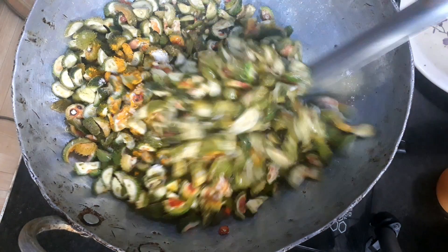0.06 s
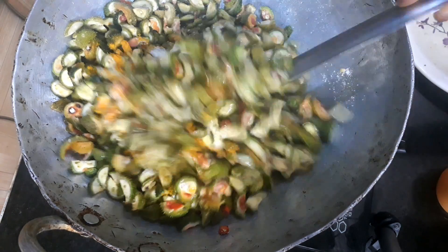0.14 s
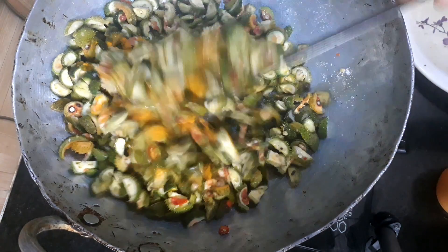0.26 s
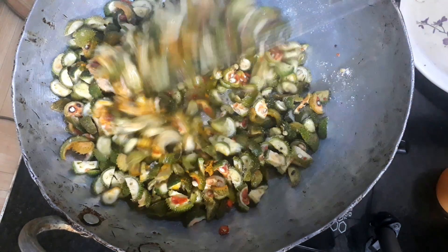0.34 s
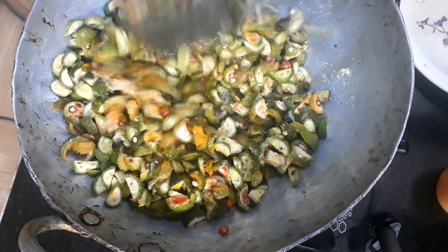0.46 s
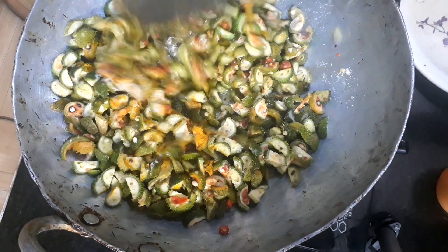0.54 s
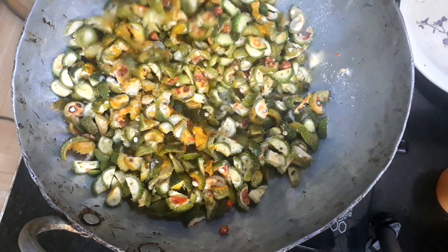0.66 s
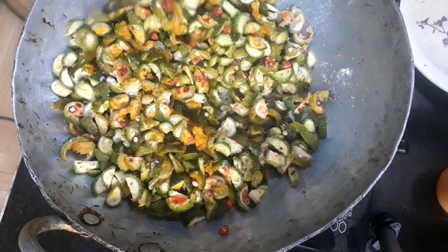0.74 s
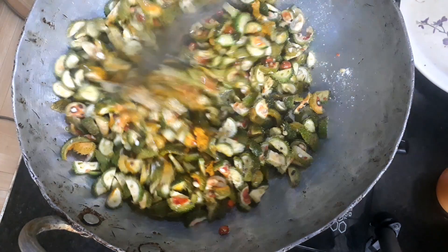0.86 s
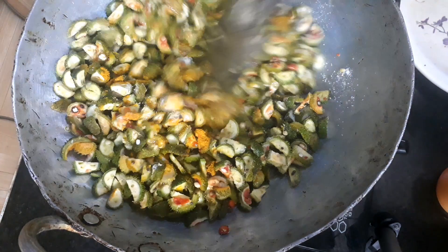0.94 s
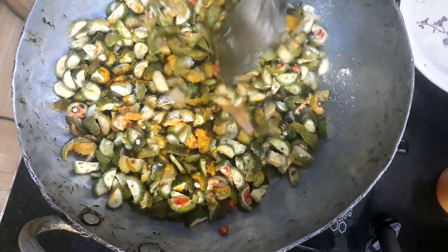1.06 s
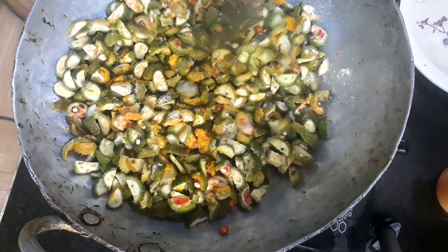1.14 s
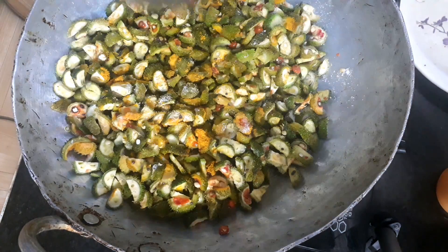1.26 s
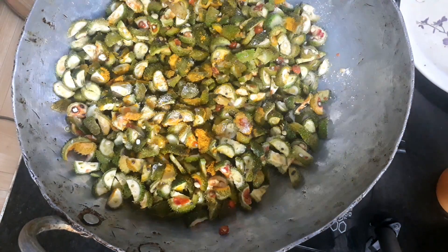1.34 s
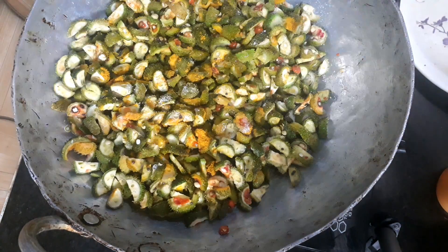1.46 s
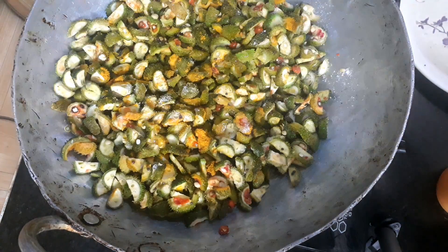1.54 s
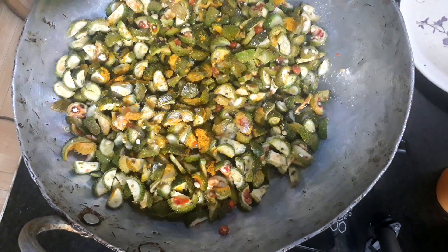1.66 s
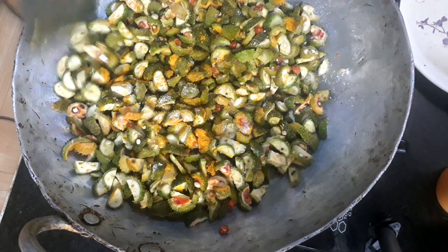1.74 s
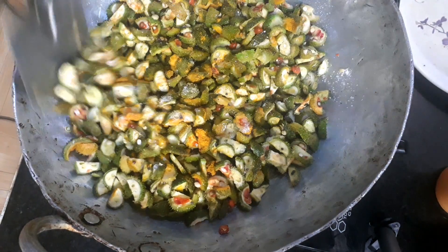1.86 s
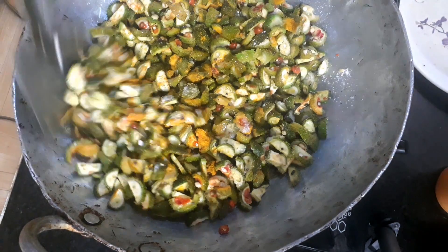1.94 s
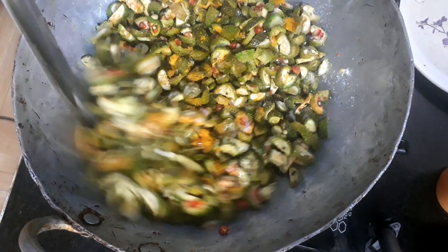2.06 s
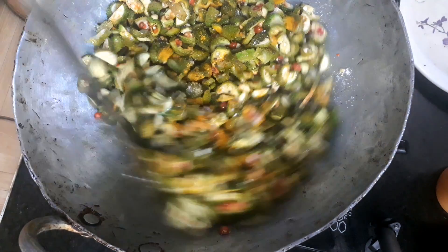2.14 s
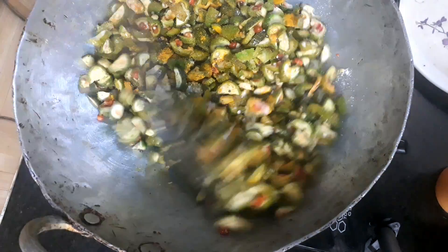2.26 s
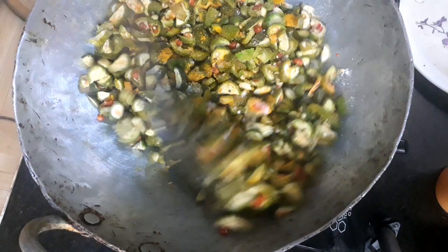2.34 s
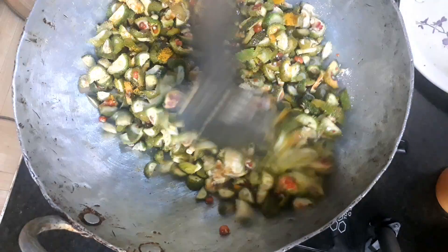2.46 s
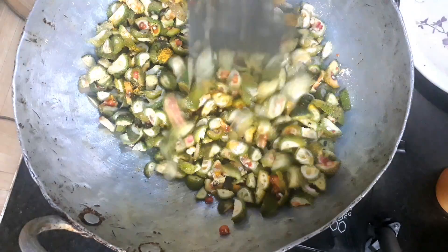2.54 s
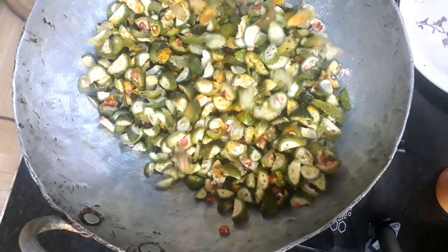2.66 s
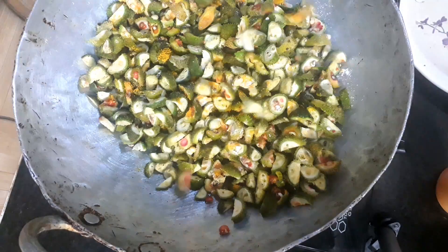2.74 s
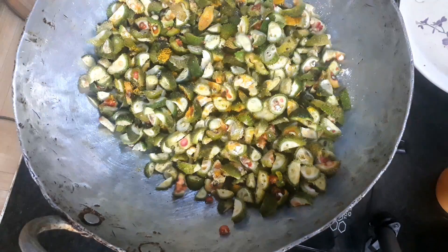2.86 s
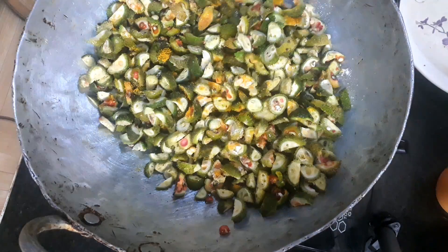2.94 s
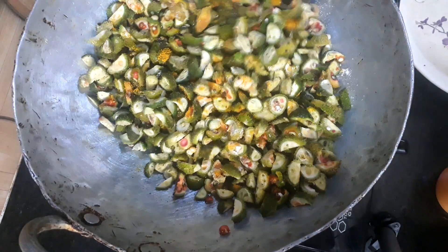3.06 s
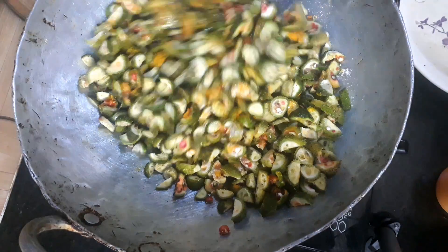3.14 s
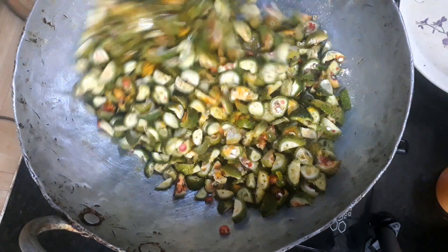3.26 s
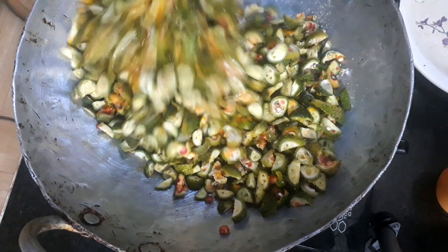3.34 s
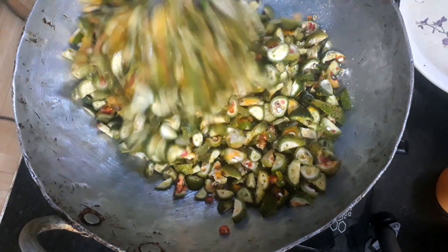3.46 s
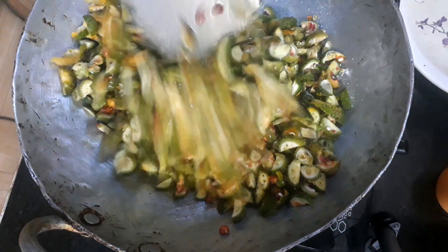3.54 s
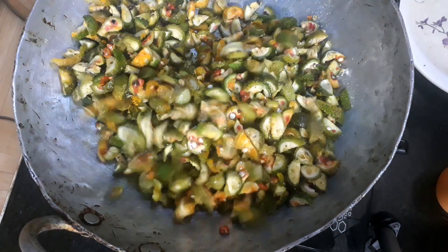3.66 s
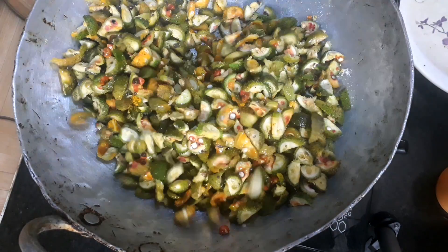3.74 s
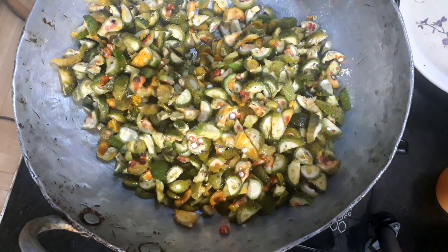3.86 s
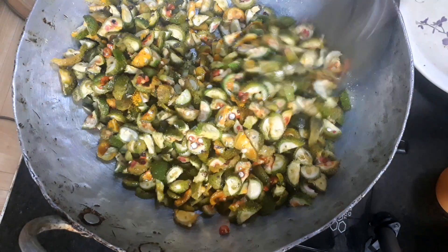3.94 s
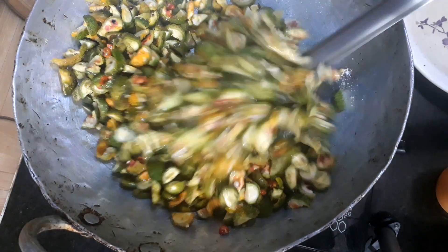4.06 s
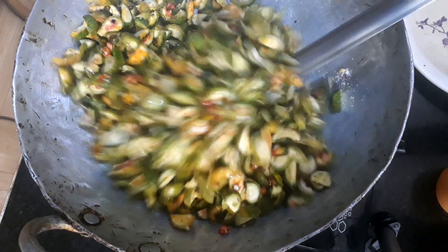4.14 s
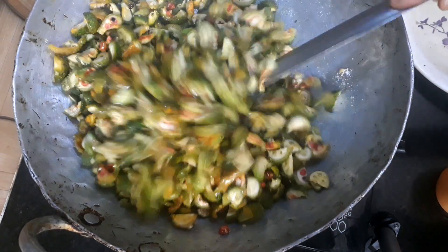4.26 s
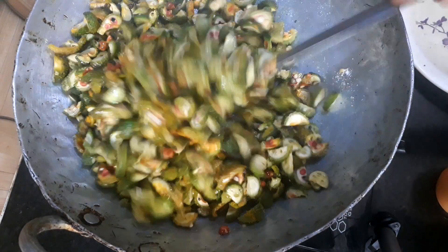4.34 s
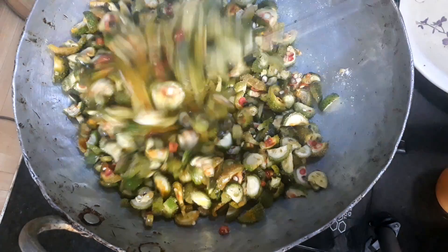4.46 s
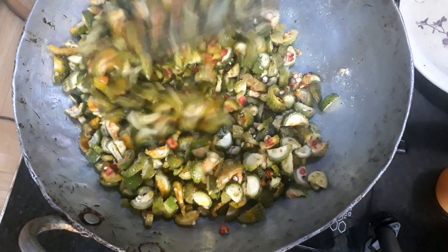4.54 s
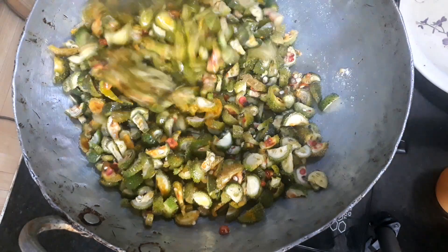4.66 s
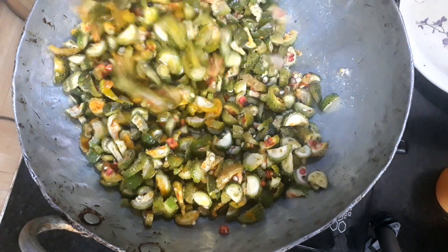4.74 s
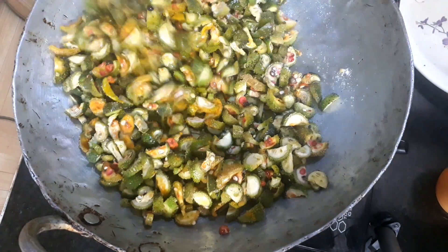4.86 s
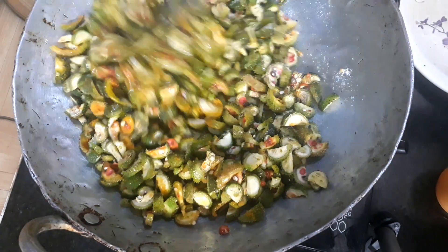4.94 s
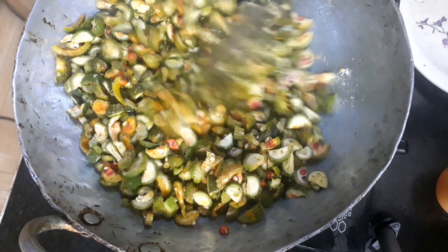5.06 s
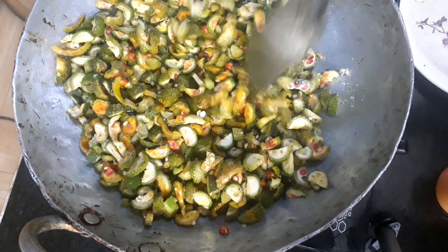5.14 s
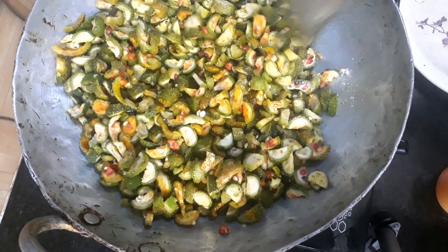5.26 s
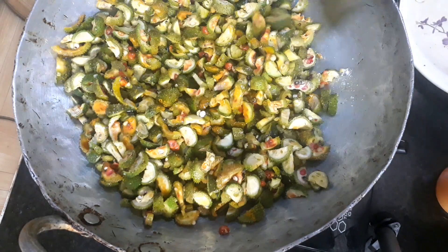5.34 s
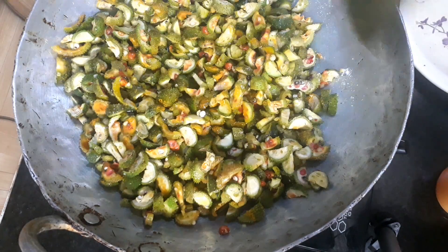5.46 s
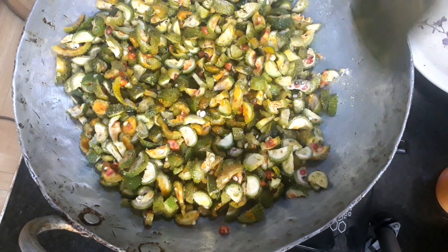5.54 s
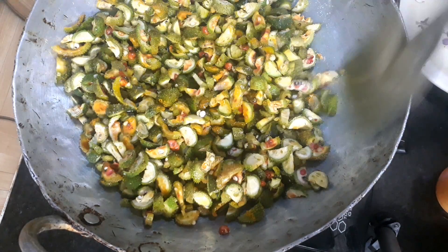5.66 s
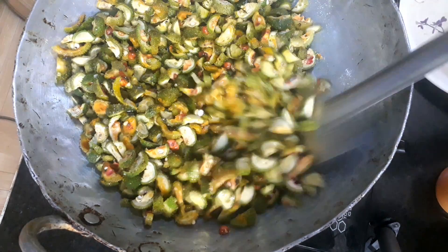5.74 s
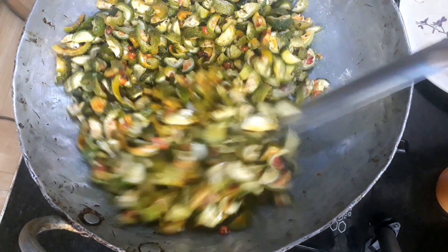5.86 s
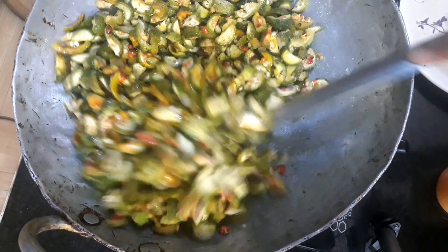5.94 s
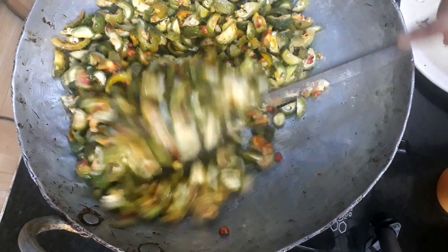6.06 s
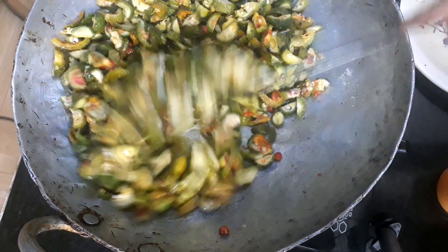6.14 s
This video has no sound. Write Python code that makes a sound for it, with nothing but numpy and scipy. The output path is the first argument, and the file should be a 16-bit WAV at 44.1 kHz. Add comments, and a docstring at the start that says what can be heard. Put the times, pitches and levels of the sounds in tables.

```python
"""Frying fizz is there from the first instant, and at once a steel spatula knocks a thin round pan.
Five strokes of the blade knock the wall and scrape through sliced vegetables: noisy contact rings damped
pan modes. Steam bubbles in the oil pop as decaying chirps thrown back by the wall; the fizz is swarms of
small bubbles over a smooth hiss. Coloured noise makes a low kitchen hum. Heard from just above."""
import sys
import numpy as np
from scipy import signal
from scipy.io import wavfile
from scipy.ndimage import uniform_filter1d

SR = 44100
rng = np.random.default_rng(int(sys.argv[2]) if len(sys.argv) > 2 else 0)


def how_loud(loudness_db):
    """Turn decibels into a plain amplitude multiplier (0 dB gives 1, 20 dB gives 10)."""
    steps = np.asarray(loudness_db, float) / 20
    return 10 ** steps


def output_pcm(signal):
    """Save a mono or channel-first signal as 16-bit PCM at the path in sys.argv[1].

    Samples are clipped to [-1, 1] before scaling.
    """
    pcm = np.clip(np.atleast_2d(signal).T, -1, 1) * 32767
    wavfile.write(sys.argv[1], SR, np.round(pcm).astype(np.int16))


N = 273801

# Modes of pan and spatula, damped by the food: pitch_hz, relative level_db, t60_s
PAN_MODES = [(277, -12, 0.25), (500, -9.5, 0.16), (562, -3.5, 0.24), (607, 1.5, 0.11), (874, -9.5, 0.086),
             (1080, -32, 0.21), (1130, 1, 0.093), (1421, -12.5, 0.096), (1572, -11, 0.14),
             (1671, -5.5, 0.095), (1812, -6.5, 0.11), (2233, -10.5, 0.15), (2410, -16, 0.14),
             (2517, -10.5, 0.034), (2500, -23.5, 0.28), (2654, -11.5, 0.1), (2800, -8.5, 0.049),
             (2940, -13.5, 0.11), (3360, -8, 0.14), (3597, -11.5, 0.047), (3950, 2, 0.019),
             (4226, -0.5, 0.043), (4450, 1, 0.029), (4830, 0, 0.046), (5170, -3.5, 0.033),
             (5800, -8.5, 0.048), (6210, -8, 0.028), (10800, -10, 0.095)]
# Groups of modes, in order wall, deep, belly, blade, edge: low_hz, high_hz
MODE_GROUPS = [(1400, 3500), (250, 750), (750, 1400), (3500, 6500), (7500, 13200)]


def spatula():
    """Slips of the blade ring the pan modes over a broad rasp; a knock favours the modes near one pitch."""
    slips_per_s, slip_spread_db = 2500, 2.97
    ring_db, rasp_db, thud_db = -20, -9.5, -33
    favour_db, favour_octaves = 15.5, 0.13
    linger = 0.41  # share of the favour that the scrape keeps after a knock
    pair_split = 0.018  # a round pan rings in close pairs, this share apart
    strength, favoured_hz, knocking = contact()
    slips = evened(clicks(slips_per_s, slip_spread_db))
    force = strength * evened(slips + 1.03 * rng.standard_normal(N))

    ring = np.zeros(N)
    for hz, db, t60 in PAN_MODES:
        group = next(k for k, (low, high) in enumerate(MODE_GROUPS) if .98 * low <= hz < 1.05 * high)
        nearness = np.exp(-(np.log2(hz / favoured_hz) / favour_octaves) ** 2)
        near_db = favour_db * np.maximum(knocking, linger) * nearness
        shake = force[group] * how_loud(db + near_db)
        if group == len(MODE_GROUPS) - 1:
            shake = shake * knocking  # the blade tip rings only when struck; a scrape damps it
        node_db = 3.5 * wander(13)  # nodes pass under the blade and swap the pair
        twin_hz = hz * (1 + pair_split * (hz < 7000))
        ring += resonate(shake * how_loud(node_db), hz, t60)
        ring += resonate(shake * how_loud(-node_db - 6.5), twin_hz, t60)

    rasp = np.zeros(N)
    for part, (low, high) in zip(force, MODE_GROUPS):
        rasp += band(part, low, high) * min(high / 1500, 1) ** 2  # grit is weak in the bass
    # ring and rasp carry little below about 230 Hz
    bass_cut = signal.butter(4, 230, "high", fs=SR, output="sos")
    radiated = signal.sosfilt(bass_cut, how_loud(ring_db) * ring + how_loud(rasp_db) * rasp)
    thud = how_loud(thud_db) * band(force[0], 22, 340)  # the whole pan rocks a little
    return radiated + thud


# The blade sliding down the wall, one list a stroke: time_s, relative pressure_db, depth (0 rim - 1 bottom)
STROKE_PATHS = [
    [(0.0, -41, .1), (0.05, -36, 0.045), (0.09, -30.5, 0.2), (0.15, -27, 0.5), (0.2, -34.5, 0.67),
     (0.25, -26, 0.61), (0.28, -46, .75), (0.34, -48, 0.38)],
    [(1.82, -37, 0.31), (1.87, -39, 0.39), (1.97, -42, 0.5), (2.03, -30.5, 0.3), (2.15, -36, 0.4),
     (2.19, -32.5, 0.94), (2.3, -33, 0.92), (2.39, -62, 0.59), (2.47, -64, 0.43)],
    [(3.03, -40, 0.73), (3.08, -37, 0.4), (3.19, -36.5, .3), (3.21, -32.5, .1), (3.28, -25.5, 0.26),
     (3.35, -29, 0.36), (3.41, -37.5, 0.55), (3.5, -42, 0.33)],
    [(4.02, -29, 0.28), (4.09, -34.5, 0.17), (4.2, -33, 0.17), (4.24, -26, 0.24), (4.31, -21, 0.43),
     (4.37, -30.5, 0.58), (4.43, -35.5, 0.52), (4.5, -101, 0.72)],
    [(5.7, -39, 0.52), (5.77, -39, 0.47), (5.8, -38.5, 0.13), (5.9, -31.5, 0.2), (6.0, -30.5, 0.23),
     (6.1, -34.5, 0.65), (6.16, -40.5, 0.52), (6.21, -36.5, 0.24)],
]
# Edge of the spatula catching the wall: start_s, relative peak_db, favoured pitch_hz,
# depth (0 rim - 1 bottom), click of the edge against the blow edge_db
WALL_KNOCKS = [(0.064, -17.5, 2750, 0.6, -21), (0.087, -12.5, 4480, 0.32, -15),
               (0.134, -11, 1714, 0.7, -19), (0.165, -8, 1614, 0.86, -30), (0.202, -10.5, 1130, .78, -30),
               (0.22, -24, 2800, 0.6, -28), (0.249, -33, 2870, 0.8, -30), (1.808, -11, 1500, 0.37, -11.5),
               (1.978, -19, 1910, 0.18, -16), (2.180, -13, 1560, 0.34, -28), (2.272, -21, 545, .98, -10),
               (3.013, -15, 1880, 0.26, 3), (3.016, -14, 10800, .1, 0), (3.085, -23, 1880, 0.1, -21),
               (3.206, -17, 2650, 0.01, -24), (3.26, -11, 1700, 0.24, -29), (3.27, -10, 2140, 0.25, -30),
               (3.32, -11, 1610, 0.48, -29), (3.997, -14, 2640, 0.02, 4), (4.005, -11, 5800, 0.12, -6),
               (4.224, -16.5, 4450, .2, -24), (4.245, -9, 2500, 0.53, -29), (4.285, -10.5, 2700, 0.7, -26),
               (4.322, -18.5, 2750, 1, -28), (5.692, -17, 4100, 0.39, -11), (5.731, -20.5, 3950, 0.41, -24),
               (5.785, -19.5, 5340, 0.3, -22), (5.97, -25, 2420, 0.8, -26), (6.028, -18, 3570, 1, -22),
               (6.097, -25, 1620, 0.5, -29), (6.199, -20.5, 2580, 0.33, -30)]
# Pressing past firm feeds the wall modes most: deep, belly, blade, edge (dB per dB of pressure)
PRESS_NARROWING = (-0.87, -0.24, -0.23, -0.8)
# A knock is too brief for some modes to answer fully: deep_db, belly_db, blade_db
KNOCK_THINNING = (-17, -21, 0)


def contact():
    """Strength of steel on pan per mode group: steady under a stroke, a short chatter after a knock."""
    firm_db, knock_db, chatter_s = -35, -10.5, 0.019
    tumble_db = 2  # pieces tumbling under the blade make the contact lumpy
    t = np.arange(N) / SR
    power = np.zeros((len(MODE_GROUPS), N))
    favoured_hz, knocking = np.ones(N), np.zeros(N)
    for path in STROKE_PATHS:
        s, pressure_db, depth = np.transpose(path)
        on = (t >= s[0]) & (t < s[-1])
        wall_db = np.interp(t[on], s, pressure_db)
        groups_db = woken_db(np.interp(t[on], s, depth)) + np.outer(PRESS_NARROWING, wall_db - firm_db)
        levels_db = wall_db + np.vstack([0 * wall_db, groups_db])
        power[:, on] = (how_loud(levels_db) * signal.windows.tukey(on.sum(), .04)) ** 2
    power *= how_loud(tumble_db * wander(104)) ** 2

    for s, peak_db, hz, depth, edge_db in WALL_KNOCKS:
        at = slice(round(s * SR), round(s * SR) + 4000)
        after = np.abs(t[at] - s)
        peak = how_loud(peak_db + knock_db)
        # food cushions a blade already in contact, so the blow rises more slowly
        scraping = power[0, at.start]
        rise_s = 0.00091 + 0.0023 * scraping / (scraping + 0.26 * peak ** 2)
        blow = peak * np.clip(after / rise_s, 0, 1) * np.exp(-(after / chatter_s) ** 1.19)
        favoured_hz[at] = hz
        knocking[at] = blow ** 2 / (blow ** 2 + power[0, at] + 1e-7)
        thinned_db = woken_db(depth)[:3] + np.asarray(KNOCK_THINNING)
        power[:, at] += np.outer(how_loud([0, *thinned_db, edge_db]), blow) ** 2
    return np.sqrt(power), favoured_hz, knocking


# What the blade wakes, against the wall modes, at even steps from rim to bottom:
# deep_db, belly_db, blade_db, edge_db
WOKEN_BY_DEPTH = [(-17, -9, 0, -10), (-15, -11.5, -6, -10), (-16, -7.5, -14.5, -13), (0.5, 5, -19.5, -14),
                  (-6, -4.5, -12, -14)]


def woken_db(depth):
    """Levels of the deep, belly, blade and edge groups when the blade touches at this depth."""
    steps = np.linspace(0, 1, len(WOKEN_BY_DEPTH))
    return np.array([np.interp(depth, steps, group) for group in np.transpose(WOKEN_BY_DEPTH)])


# The loudest bubbles and spits: start_s, relative level_db, starting pitch_hz, decay in cycles
LOUD_POPS = [(0.319, -20, 3740, 4.7), (0.361, -18, 3130, 4.6), (0.423, -28, 1600, 5.1),
             (0.484, -22.5, 5000, 3.7), (0.491, -21, 1690, 2.5), (0.533, -25.5, 4540, 7.3),
             (0.645, -28, 2340, 4), (0.744, -21.5, 2500, 1.9), (0.877, -22.5, 1880, 1.9),
             (0.896, -26, 3500, 2), (0.905, -25, 2200, 4.6), (0.944, -17.5, 3040, 6),
             (1.272, -26, 3100, 2.5), (1.428, -28, 1680, 1.1), (1.779, -13, 2280, 1.9),
             (2.47, -25.5, 3950, 2.5), (2.528, -31, 3020, 3.4), (2.701, -19.5, 1760, 3),
             (2.843, -21, 2650, 1.2), (2.955, -24, 1620, 5.2), (3.114, -17, 1890, 1.6),
             (3.439, -23, 2820, 4.8), (3.572, -23, 2860, 10), (3.851, -25, 4430, 5.6),
             (3.918, -24, 4400, 3), (4.565, -22, 4050, 2.4), (4.644, -25, 1590, 3.1),
             (4.793, -24.5, 2460, 4.8), (4.816, -23, 3500, 1.8), (4.955, -25, 1590, 2.2),
             (5.036, -24.5, 3400, 4.3), (5.444, -26, 2200, 5.1), (5.531, -29, 4800, 2),
             (5.556, -26.5, 2080, 6.6)]
# The curved wall throws each pop back: delay_s, level_db against the pop
PAN_WALL_ECHOES = [(.0013, -12), (.0028, -14.5), (.0055, -10)]


def pops():
    """Each pop is a bubble with a tick and a short noisy spatter, echoed by the pan wall."""
    small_count, small_db, small_range_db = 24, -30, 6  # small pops are scattered by chance
    spatter_share, spatter_decay_s = 0.21, 0.0037
    out, t = np.zeros(N + 599), np.arange(599) / SR
    when, size, pitch, length = rng.random((small_count, 4)).T
    small_levels_db = small_db + small_range_db * (size - .5)
    small = zip(when * N / SR, small_levels_db, 1400 * 3.2 ** pitch, 1.5 + 1.4 * length)
    tick = -1.7 * np.exp(-t / .00005)
    for s, level_db, hz, cycles in [*LOUD_POPS, *small]:
        grit = uniform_filter1d(rng.standard_normal(599), size=3)
        spatter = spatter_share * grit * np.exp(-t / spatter_decay_s)
        out[round(s * SR):][:599] -= how_loud(level_db) * (bubble(hz, cycles) + tick + spatter)
    echoes = sum(how_loud(db) * np.roll(out, round(delay * SR)) for delay, db in PAN_WALL_ECHOES)
    return signal.lfilter(*signal.butter(2, 600, "high", fs=SR), out + echoes)[:N]


def bubble(hz, cycles):
    """A bursting bubble: a sharp start, then a few cycles that rise in pitch."""
    turns = np.arange(1, 600) / SR * hz
    return np.cos(2 * np.pi * turns * (1 + 0.016 * turns)) * np.exp(-turns / cycles)


# Fizz of the oil, livelier just after the food is turned:
# time_s, level_db before the treble shift, treble_db shift against it
FIZZ_LEVELS = [(0.34, -36, 3), (0.55, -38, -3), (0.75, -39.5, 1), (1.2, -38, 0), (1.38, -36.5, 2.5),
               (1.6, -40, -3), (1.79, -37.5, 0), (2.47, -39.5, -3), (2.62, -38, -1), (2.84, -40, 2),
               (3.0, -37.5, 0), (3.5, -38.5, 0.5), (3.9, -41, -7), (4.5, -38, 2), (4.64, -39, -1),
               (5.1, -38, 0), (5.5, -40.5, 1.5), (5.67, -40, -2)]
# Filter that colours the fizz: frequency_hz, relative gain_db
FIZZ_FILTER = [(120, -39), (200, -20), (239, -35), (445, -10.5), (720, -10), (830, -11), (1390, -3),
               (1600, -2), (3150, -1), (5780, -7), (9510, -21), (12600, -16), (13300, -25), (14100, -56)]


def fizz():
    """Bubbles of many sizes burst, each size in its own short bouts, over a smooth hiss."""
    bubbles_per_s, bubble_spread_db = 1600, 2.5  # the rate of all sizes together, before the surges
    smooth_share = 0.54  # hiss share of the power, before colouring
    surge_db = 2.5 * wander(12) + 2.2 * wander(40)  # the whole pan spits more or less
    pitches_hz = np.geomspace(900, 11000, 14)
    grains = np.zeros(N)
    for hz in pitches_hz:
        rate = bubbles_per_s / len(pitches_hz) * how_loud(surge_db + 7.5 * wander(22))
        burst = evened(np.diff(bubble(hz, 2.0))) * (hz / 1000) ** 0.44
        grains += signal.oaconvolve(clicks(rate, bubble_spread_db), burst)[:N]
    hiss = rng.standard_normal(N) * how_loud(0.5 * wander(60))
    blend = np.sqrt(smooth_share) * evened(hiss) + np.sqrt(1 - smooth_share) * evened(grains)
    mixed = evened(coloured(blend, FIZZ_FILTER))

    s, level_db, treble_db = np.transpose(FIZZ_LEVELS)
    t = np.arange(N) / SR
    spray = signal.sosfilt(signal.butter(4, 7500, "high", fs=SR, output="sos"), mixed)
    brighter = how_loud(np.interp(t, s, treble_db)) - 1  # the finest bubbles come and go
    return how_loud(np.interp(t, s, level_db)) * (mixed + brighter * spray)


# Spectrum of the kitchen hum: frequency_hz, relative gain_db
HUM_FILTER = [(12, -32), (20, -2), (22, -6.5), (64, -12.5), (92, 0.5), (175, -5), (198, -12.5), (239, -4.5),
              (376, -7), (400, -2), (520, -25), (880, -120)]


def hum():
    """Low rumble of the kitchen: white noise through a bass-heavy filter."""
    hum_db = -59  # rms
    return how_loud(hum_db) * evened(coloured(rng.standard_normal(N), HUM_FILTER))


def clicks(per_s, spread_db):
    """Sparse clicks of random sign; most are small, a few large."""
    hit, size, sign = rng.random((3, N))
    size_db = spread_db * np.minimum(-np.log(1 - size), 4.2)
    return (hit < per_s / SR) * how_loud(size_db) * np.sign(sign - .5)


def wander(hz):
    """Slow chance of rms 1, changing about hz times a second."""
    steps = evened(rng.standard_normal(N // 128 + 2000))  # one step every 128 samples
    smooth = signal.lfilter(*signal.butter(2, hz * 256 / SR), steps)[1000:]
    return np.interp(np.arange(N) / 128, np.arange(len(smooth)), evened(smooth))


def resonate(x, hz, t60):
    """One mode: white noise of rms 1 comes out at the same level whatever the decay."""
    r, turn = 10 ** (-3 / (t60 * SR)), 2 * np.pi * hz / SR
    drive = np.sin(turn) * 2 * np.sqrt((1 - r) * SR / 4000)
    return signal.lfilter([drive], [1, -2 * r * np.cos(turn), r * r], x)


def band(x, low_hz, high_hz):
    """Band-pass that turns white noise of rms 1 into rms 1."""
    passed = signal.sosfilt(signal.butter(2, [low_hz, high_hz], "band", fs=SR, output="sos"), x)
    return passed * np.sqrt(SR / 2 / (high_hz - low_hz))


def coloured(x, points):
    """Convolves with the causal (minimum phase) filter of a spectrum table."""
    hz, db = np.transpose(points)
    bins_hz = np.abs(np.fft.fftfreq(8192, 1 / SR))
    log_gain = np.interp(np.log(bins_hz + 1), np.log(hz + 1), db) * np.log(10) / 20
    taps = np.fft.ifft(np.exp(np.conj(signal.hilbert(log_gain)))).real[:4096]
    return signal.oaconvolve(x, taps)[:N]


def evened(x):
    """Scales to rms 1."""
    return x / np.sqrt(np.mean(x ** 2) + 1e-20)


def scene():
    """All sources reach one spot above the pan, alike in both channels."""
    return np.tile(spatula() + pops() + fizz() + hum(), (2, 1))


def band_limit(x):
    """A steep low-pass at the top of the band."""
    return signal.sosfilt(signal.butter(12, 14210, fs=SR, output="sos"), x)


def record(dry):
    """Limits the band; in flickering patches the treble differs between left and right."""
    top_hz = 13150
    apart_from_hz, apart_db, apart_share = 4370, -1, 0.5  # share of all treble patches
    low_pass = signal.firwin(511, top_hz, window=("kaiser", 8), fs=SR)
    dry = signal.oaconvolve(dry, low_pass[None], "same")
    hz, t, z = signal.stft(dry[0], SR, nperseg=1024, noverlap=768)
    level = np.sqrt(np.abs(uniform_filter1d(np.abs(z) ** 2, size=16, axis=0)))
    a, b, patches = rng.standard_normal((len(t), len(hz), 3)).T

    flicker = evened(uniform_filter1d(patches[0], size=9))  # shared by all frequencies
    patches = uniform_filter1d(uniform_filter1d(patches, size=50, axis=0), size=12, axis=1)
    patches = evened(patches) + 2.66 * flicker
    treble = 1 / (1 + (apart_from_hz / (hz[:, None] + 1)) ** 60)
    on = (patches < np.quantile(patches, apart_share)) * treble
    side_spectrum = level * on * (a + 1j * b) * how_loud(apart_db)
    side = signal.istft(side_spectrum, SR, nperseg=1024, noverlap=768)[1][:N]
    return band_limit(dry + np.array([side, -side]))


dry = scene()
out = record(dry)
output_pcm(out)
```